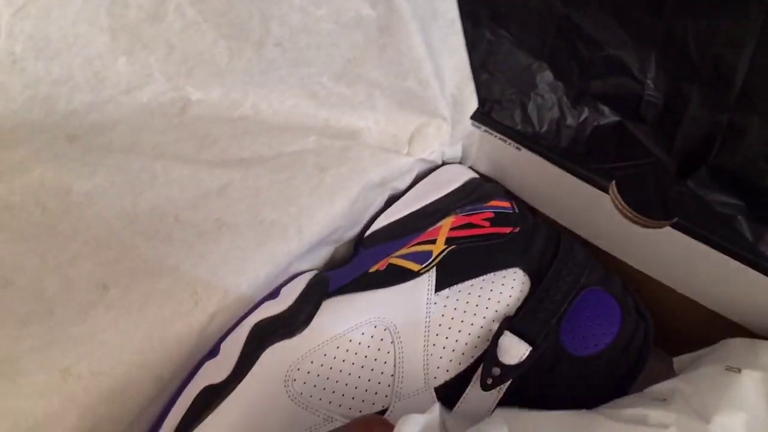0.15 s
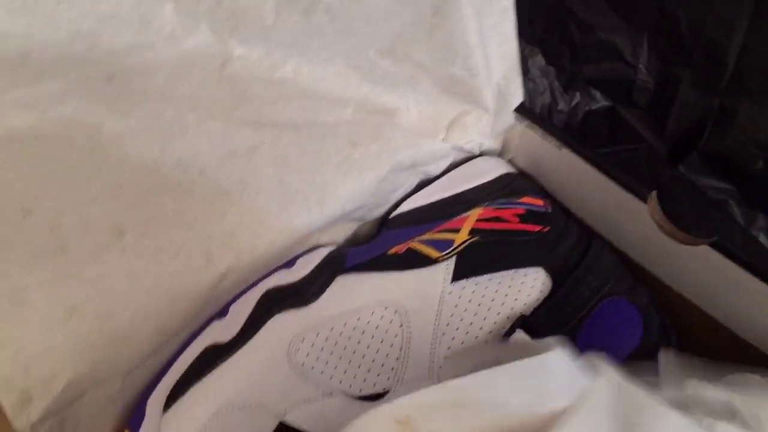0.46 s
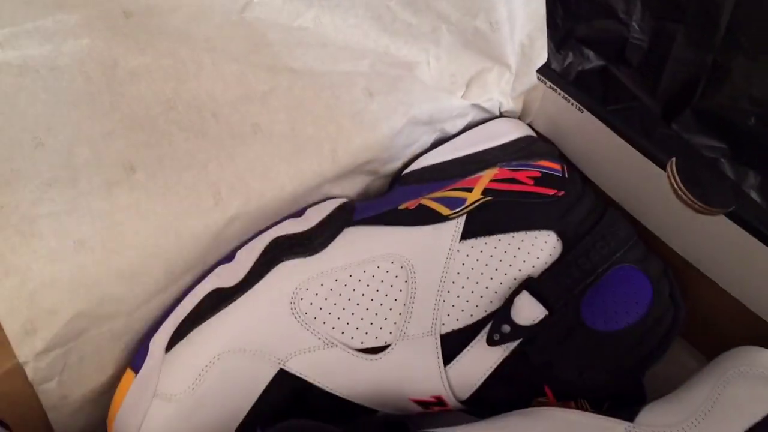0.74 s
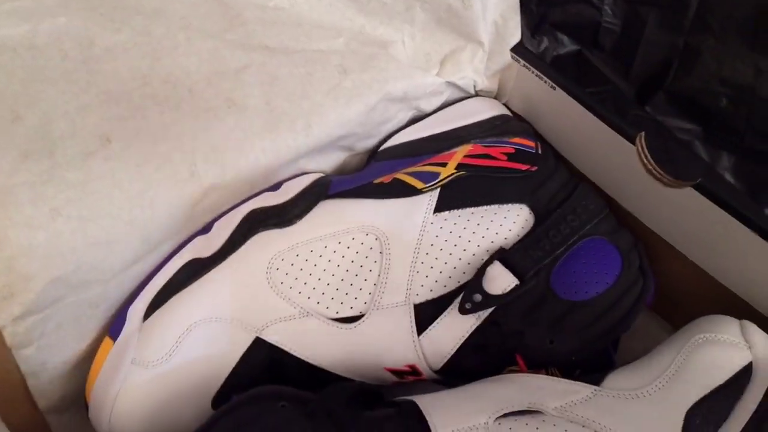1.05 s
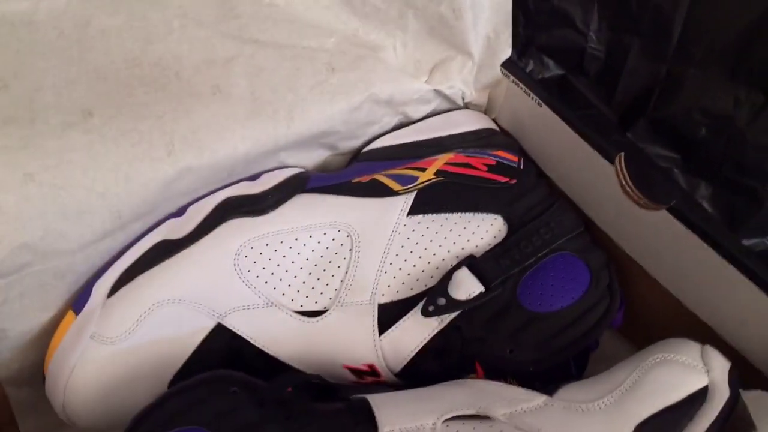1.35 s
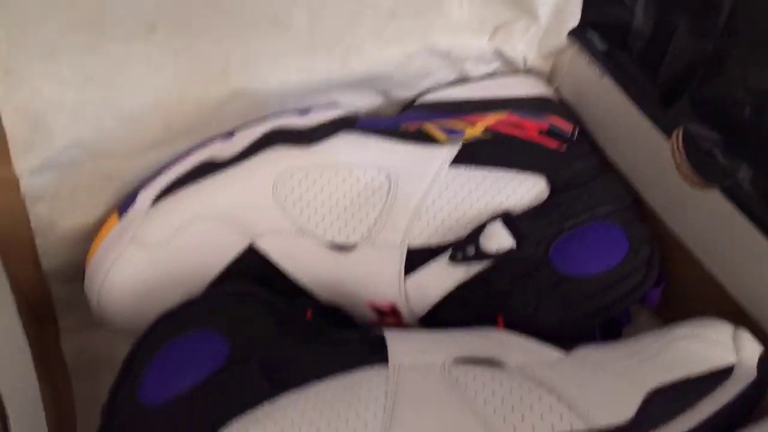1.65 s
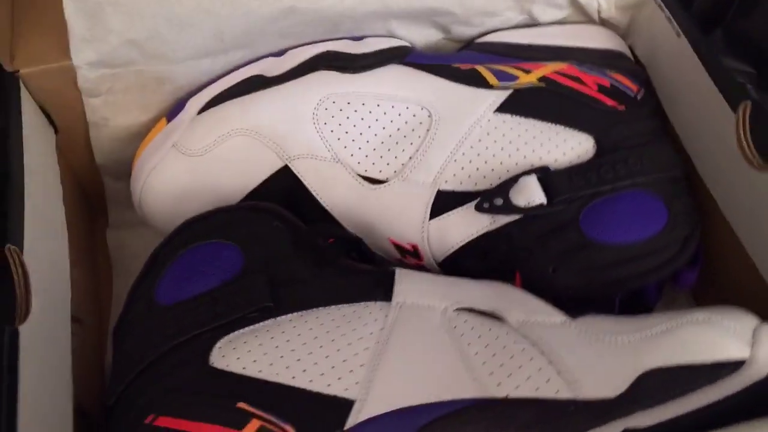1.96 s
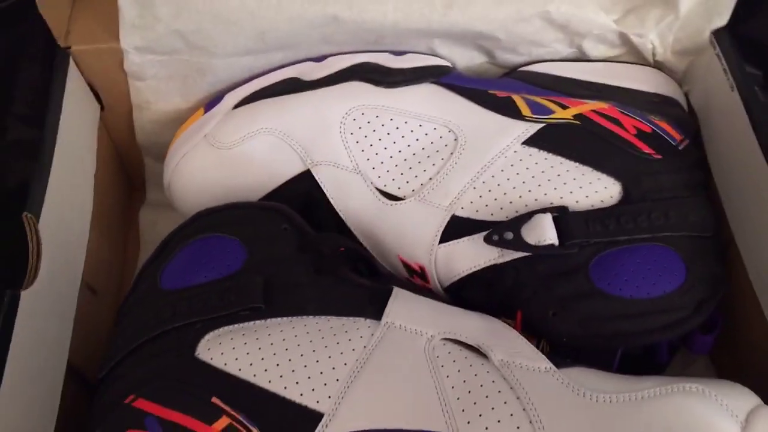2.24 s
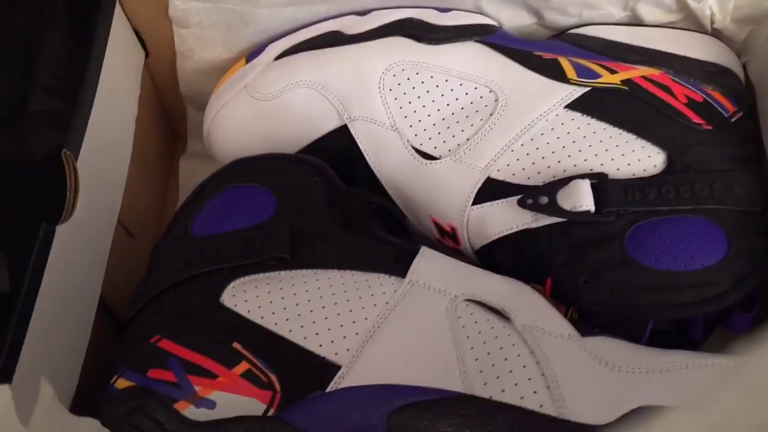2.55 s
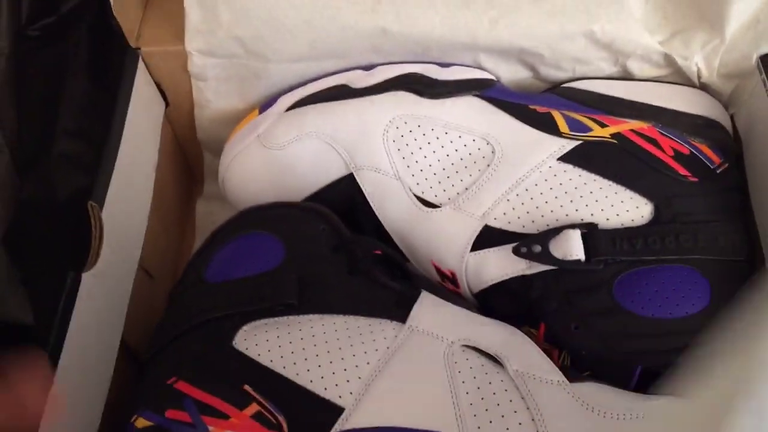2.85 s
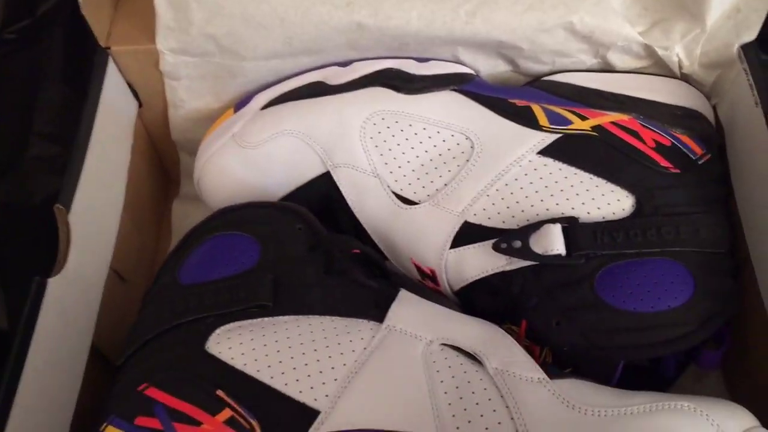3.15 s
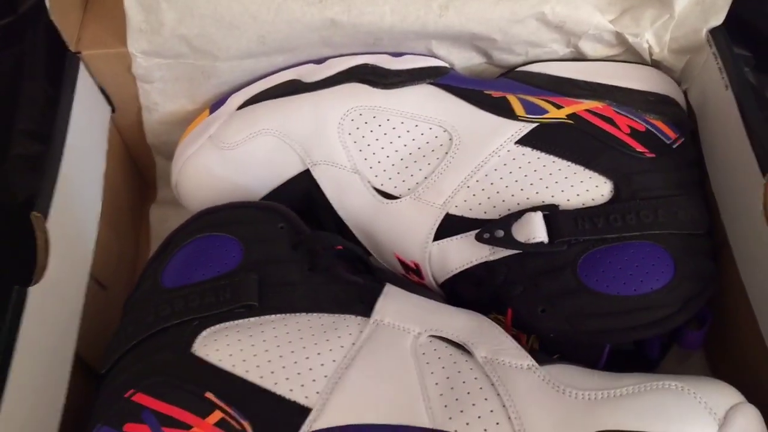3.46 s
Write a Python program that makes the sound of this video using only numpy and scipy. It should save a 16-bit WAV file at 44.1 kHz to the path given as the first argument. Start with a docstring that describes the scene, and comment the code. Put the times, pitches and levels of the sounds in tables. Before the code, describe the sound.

Close, crisp rustling of tissue paper in a shoebox starts loud, thins to small snaps and soft scuffs against cardboard, then builds again. A low rumble lies underneath in the small room.

```python
"""A crackle of tissue paper comes first, close by: a hand crumples one sheet aside in a shoebox,
then slides and folds back another. Creases release their elastic energy in single snaps, over a bed
of tiny buckles and the friction hiss of paper on paper. Small panels pop through with a hollow tick,
and the paper scuffs the cardboard. Box and room answer briefly; a low room rumble lies underneath."""
import sys
import numpy as np
from scipy import signal
from scipy.fft import rfft, irfft, next_fast_len
from scipy.io import wavfile
from scipy.ndimage import uniform_filter1d

SR = 44100
rng = np.random.default_rng(int(sys.argv[2]) if len(sys.argv) > 2 else 0)


def dump(signal):
    """Clip the signal to [-1, 1] and save it as 16-bit WAV at the path in sys.argv[1]."""
    limited = np.clip(np.atleast_2d(signal).T, -1, 1)
    pcm = np.round(limited * 32767).astype(np.int16)
    wavfile.write(sys.argv[1], SR, pcm)


N = 158760

# spectral shape of the room's background: frequency_hz, gain_db
ROOM_SPECTRUM = [(20, -44.5), (50, -8), (80, 4), (92, 3), (120, 4.5), (145, -4.5), (170, -16), (500, -36.5),
                 (2000, -38.5), (15000, -49.5)]
# spectral shape of the wall reflections: frequency_hz, gain_db
WALL_SPECTRUM = [(600, -1.5), (1900, 2.5), (4000, -12.5), (12000, -4)]
# spectral shape of the paper in the box: frequency_hz, gain_db
PAPER_SPECTRUM = [(30, -27.5), (140, -7), (260, -2.5), (370, -5.5), (480, -6.5), (800, -3.5), (1700, 0),
                  (3400, -0.5), (4900, -3.5), (6300, -2), (7700, -7), (9200, -6), (10400, -10.5),
                  (11800, -8), (15000, -11.5)]
# the hand's effort as it crumples the first sheet: time_s, level_db
CRUMPLE_EFFORT = [(0.0, -40.5), (0.09, -47.5), (0.12, -33), (0.18, -24.5), (0.25, -26.5), (0.29, -32.5),
                  (0.36, -28.5), (0.395, -39.5), (0.495, -32), (0.518, -19), (0.548, -27.5), (0.584, -19.5),
                  (0.604, -26.5), (0.66, -36), (0.74, -37.5), (0.81, -32.5), (0.833, -28.5), (0.861, -35),
                  (0.91, -37.5), (0.945, -57.5), (1.005, -46), (1.06, -43), (1.12, -53), (1.23, -43.5),
                  (1.285, -27.5), (1.325, -31.5), (1.361, -31), (1.387, -21.5), (1.411, -31), (1.469, -41),
                  (1.499, -56), (1.55, -81.5)]
# the hand's effort as it slides and folds the second: time_s, level_db, tilt_db_per_octave
FOLD_EFFORT = [(1.76, -49.5, -8), (1.77, -43, -1.8175), (1.85, -31, 2), (1.877, -44, -4), (1.94, -82, 3),
               (2.22, -58.5, 2), (2.289, -45, 4.5), (2.358, -47, 2), (2.408, -36, -0.5), (2.435, -47.5, 2),
               (2.466, -39, -4.5), (2.515, -69.5, -5.5), (2.57, -50.5, 6), (2.613, -64, -2.5),
               (2.63, -32.5, 1.9573), (2.652, -64, -7), (2.762, -72.5, 2), (2.783, -41, -2.5),
               (2.815, -82, -4.5), (2.899, -31, 2.5), (2.925, -50, -0.5), (2.956, -29.5, 2.5),
               (3.021, -45, -4), (3.065, -33, 1.6446), (3.113, -30.5, -1.4811), (3.181, -53, 0),
               (3.257, -62.5, -5.5), (3.276, -31, -1.9829), (3.341, -49, 1), (3.358, -36.5, -2.5),
               (3.459, -18, 2.2055), (3.486, -31.5, -2), (3.554, -51, -2.5), (3.6, -34, 1.19)]
# paper brushing the cardboard: start_s, level_db, length_ms, resonance_hz
CARDBOARD_SCUFFS = [(1.465, -34, 57.59, 1911), (1.641, -49, 22.495, 1950), (1.7, -43.5, 30.32, 1310),
                    (2.245, -38.5, 76.36, 1360), (2.483, -40.5, 30.75, 3000)]
# small panels of paper popping through: start_s, level_db, resonance_hz
PANEL_POPS = [(0.2986, -26, 1800), (0.9892, -22.5, 6426), (1.0253, -31, 1625), (1.1354, -28.5, 2520),
              (1.6626, -46.5, 3270), (1.859, -23.5, 2616), (1.9787, -44, 1792), (2.104, -44.5, 1577),
              (2.687, -45.5, 1684), (3.317, -21, 1676), (3.5694, -29.5, 2443)]
# creases letting go: start_s, relative_level_db, length_ms, tilt_db_per_octave
CREASE_SNAPS = [(0.1261, -19, 11.81, 0.5), (0.1501, -16, 4.777, 6.5), (0.2252, -23, 4.664, 1),
                (0.2741, -18, 4.083, 2.0876), (0.3432, -26.5, 4.3, 3), (0.38, -26, 3.584, 5.5),
                (0.4039, -29, 4.9, 1), (0.4173, -22, 6.956, 1), (0.468, -20.5, 1.75, 4.5),
                (0.5017, -19, 5.93, 1.5), (0.5243, -15, 5.287, 6), (0.5653, -17, 13.21, 1),
                (0.579, -12, 13.305, 5.2), (0.644, -21.5, 7.524, 3.5), (0.7109, -26.5, 5.185, 3),
                (0.756, -23.5, 3.14, 0.5), (0.8165, -18, 2.644, 6), (0.827, -16.5, 5.815, 4),
                (0.8709, -24.5, 6.77, -1.5), (0.8944, -29, 0.881, 0), (0.923, -32.5, 3.764, 0),
                (0.9548, -28.5, 1.248, 8.5), (0.9784, -26.5, 1.278, 1.5), (0.9898, -22.5, 2.853, 1.1054),
                (1.0341, -33, 2.13, 2), (1.0964, -29, 1.866, 2.5), (1.1481, -23.5, 2.057, 0.5),
                (1.167, -31, 1.932, 4.2781), (1.187, -30, 9.84, -2), (1.214, -21, 2.678, 5.5),
                (1.2635, -23.5, 1.825, 4.5), (1.2944, -25.5, 0.584, 8.5), (1.35, -21.5, 5.16, 3.5),
                (1.37, -18, 8.9, 1.5), (1.4278, -29.5, 5.17, -1.5), (1.7664, -29.5, 2.317, 2.5),
                (1.7927, -31.5, 1.447, 5.5), (1.859, -22, 1.452, 5.5), (1.897, -38, 2.806, -3),
                (1.9131, -44.5, 2.305, -2), (2.1809, -34.5, 1.501, 0.1823), (2.3363, -34.5, 3.978, -1.0055),
                (2.384, -35.5, 3.34, -2.5), (2.4018, -22.5, 1.426, -1), (2.4069, -29, 1.731, -1.5),
                (2.442, -37.5, 4, -0.5), (2.458, -25.5, 3.677, 3.5), (2.525, -39, 2.413, 4.5),
                (2.598, -46.5, 2.2, 0.5), (2.837, -37.5, 13.58, -2), (2.942, -29.5, 7.36, 0.9424),
                (2.9781, -25.5, 9.176, -1), (3.0522, -21.5, 3.48, 1.5), (3.0952, -24, 2.336, 3),
                (3.2158, -38.5, 12.635, -1), (3.3171, -25.5, 0.772, -2), (3.3621, -22.5, 1.284, 8.5),
                (3.4127, -20, 0.4403, 4), (3.4355, -23, 0.882, -0.5)]

TILT_PIVOT_HZ, RESONANCE_OCTAVES = 4760, 1.15
ROOM_DB, HANDLING_DB, HANDLING_HZ = -48, -70.5, 1086.4
BOX_DB, BOX_T60_S = -12.5, 0.034735
WALLS_DB, WALLS_T60_S = -23, 0.2784
BUCKLES_PER_S, BUCKLE_ONSET_DB = 450, -57.5  # well below this effort the paper only slides
BUCKLE_CEILING = 4.7  # largest buckle, in standard deviations of level
SCUFF_PEAK_DB, POP_PEAK_DB, POP_T60_S = 14, 26, 0.01733
CRINKLE_DB, CRINKLE_SPAN_S = -16, 0.033
FLAP_PEAK_DB, FLAP_HZ, FLAP_CUT_HZ = 3, 3001, 200  # a small flap radiates little below the cut
SNAP_TRIM_DB, SNAP_FALL_DB, SNAP_RISE_S = 2, 7.5, 0.00052  # the fall is per snap length
SATURATION, TOP_HZ = 0.6, 15300


def amp(db):
    return 10 ** (np.asarray(db) / 20)


def unit_rms(x):
    return x / np.sqrt(np.mean(x ** 2) + 1e-20)


def along(spectrum, hz):
    """Gain in dB, interpolated on a logarithmic frequency axis."""
    points_hz, gain_db = np.transpose(spectrum)
    return np.interp(np.log(hz + 1), np.log(points_hz + 1), gain_db)


def octaves(hz):
    """Interval from the pivot of a spectral tilt; the bass counts as one band."""
    return np.log2(np.maximum(hz, 900) / TILT_PIVOT_HZ)


def resonance(hz, centre_hz, width_octaves=RESONANCE_OCTAVES):
    """A resonance curve of height 1, symmetric in log frequency."""
    return 1 / (1 + (np.log2((hz + 1) / centre_hz) / width_octaves) ** 2)


def coloured(x, gain_db, size=2 ** 18):
    """Minimum-phase filtering: folding the cepstrum gives a causal filter with gain_db(hz)."""
    cepstrum = irfft(np.log(amp(gain_db(np.fft.rfftfreq(size, 1 / SR)))))
    cepstrum[1:size // 2] *= 2
    cepstrum[size // 2 + 1:] = 0
    return irfft(rfft(x, size) * np.exp(rfft(cepstrum)), size)[:len(x)]


def noise(gain_db):
    """Gaussian noise of rms 1 with the spectral shape gain_db(hz)."""
    return unit_rms(coloured(rng.standard_normal(N), gain_db))


def flexing(x, tilt_at, patchy_db):
    """Bending alters a sheet's response: the spectrum tilts and resonances come and go."""
    hz, t, spectra = signal.stft(x, SR, nperseg=512)
    patches = uniform_filter1d(rng.standard_normal(spectra.shape), size=5, axis=0)
    patches = unit_rms(uniform_filter1d(patches, size=7, axis=1))
    gain = amp(patchy_db * patches + octaves(hz)[:, None] * tilt_at(t))
    return signal.istft(spectra * gain, SR, nperseg=512)[1][:N]


def add(out, start_s, db, tick):
    """Superpose a transient carrying the energy of 5 ms at level db."""
    tick = tick * amp(db) * np.sqrt(SR / 200) / np.linalg.norm(tick)
    part = out[round(start_s * SR):][:len(tick)]
    part += tick[:len(part)]


def room_rumble():
    """Ambient noise: stationary, with its energy concentrated in the bass."""
    return amp(ROOM_DB) * noise(lambda hz: along(ROOM_SPECTRUM, hz))


def box_handling():
    """Frictional excitation: shifting fingers faintly stir the cardboard's resonances."""
    rub = noise(lambda hz: 30 * resonance(hz, HANDLING_HZ, width_octaves=2.2))
    return amp(HANDLING_DB) * unit_rms(flexing(rub, lambda t: -2, patchy_db=5.5))


def reflected(x, t60_s, delay_s, count=12):
    """Echo paths change as the paper moves: convolution with a succession of decaying responses."""
    t = np.arange(int(t60_s * SR) + 8) / SR
    position = np.linspace(0, count - 1, N)
    out = np.zeros(N)
    for k in range(count):
        tail = rng.standard_normal(len(t)) * np.exp(-np.log(1000) * t / t60_s)
        response = np.pad(tail / np.linalg.norm(tail), (round(delay_s * SR), 0))
        crossfade = np.maximum(1 - abs(position - k), 0)
        out += signal.oaconvolve(x * crossfade, response)[:N]
    return out


def echoes(x):
    """Reverberation: quick reflections inside the box, then a faint tail from the walls."""
    box = coloured(reflected(x, BOX_T60_S, delay_s=0.0013948), lambda hz: -1.2 * octaves(hz))
    walls = coloured(reflected(x, WALLS_T60_S, delay_s=0.0092), lambda hz: along(WALL_SPECTRUM, hz))
    return amp(BOX_DB) * box + amp(WALLS_DB) * walls


def waft(db, centre_hz):
    """Air displacement: the whole moving sheet radiates a low flutter."""
    return amp(db) * noise(lambda hz: -15 * np.log10(1 + np.log2((hz + 1) / centre_hz) ** 4))


def buckles(spread_db, decay_s):
    """Buckling as a Poisson process: tiny crackles of log-normal size, together of rms 1."""
    sizes = amp(spread_db * np.minimum(rng.standard_normal(N), BUCKLE_CEILING))
    onsets = rng.random(N) < BUCKLES_PER_S / SR
    power = signal.lfilter([1], [1, -np.exp(-2 / (decay_s * SR))], (sizes * onsets) ** 2)
    crackle = np.sqrt(power) * rng.standard_normal(N)
    return unit_rms(coloured(crackle, lambda hz: along(PAPER_SPECTRUM, hz) + 0.5 * octaves(hz)))


def rustle(effort, crackle_db, hiss_db, hiss_tilt, spread_db, decay_s):
    """Sliding friction hisses; buckling joins in once the hand presses hard enough."""
    hiss = noise(lambda hz: along(PAPER_SPECTRUM, hz) + hiss_tilt * octaves(hz))
    buckling = effort / (effort + amp(BUCKLE_ONSET_DB))
    return effort * (amp(crackle_db) * buckling * buckles(spread_db, decay_s) + amp(hiss_db) * hiss)


def stroke(time_s, level_db):
    """Amplitude envelope of one hand movement, silent outside its span."""
    return amp(np.interp(np.arange(N) / SR, time_s, level_db, left=-120, right=-120))


def crumpling():
    """Buckling dominates the first sheet's rustle, which dulls as the hand eases off."""
    time_s, level_db = np.transpose(CRUMPLE_EFFORT)
    effort = stroke(time_s, level_db)
    tilt_at = lambda t: np.minimum(0.3456 * (np.interp(t, time_s, level_db) + 39.0), 0)
    sheet = rustle(effort, crackle_db=-1.5, hiss_db=-4, hiss_tilt=-1.5023,
                   spread_db=5.0, decay_s=0.0004665)
    return flexing(sheet + effort * waft(db=-28.5, centre_hz=326.09), tilt_at, patchy_db=3.0)


def folding():
    """Friction has a larger share in the second sheet, which slides more and crackles less."""
    time_s, level_db, tilt = np.transpose(FOLD_EFFORT)
    effort = stroke(time_s, level_db)
    tilt_at = lambda t: np.interp(t, time_s, tilt)
    sheet = rustle(effort, crackle_db=-2, hiss_db=-2.5, hiss_tilt=-0.5, spread_db=6.5, decay_s=0.0005)
    return flexing(sheet + effort * waft(db=-18.5, centre_hz=106.6), tilt_at, patchy_db=2.4242)


def scuffs():
    """Friction against the cardboard: a soft swell of noise through one broad resonance."""
    out = np.zeros(N)
    for start_s, db, length_ms, ring_hz in CARDBOARD_SCUFFS:
        swell = np.hanning(round(length_ms * SR / 1000))
        colour = lambda hz: (along(PAPER_SPECTRUM, hz) + SCUFF_PEAK_DB * resonance(hz, ring_hz)
                             - 2 * octaves(hz))
        add(out, start_s, db, coloured(swell * rng.standard_normal(len(swell)), colour, size=8192))
    return out


def pops():
    """Snap-through instability: a panel flips over and rings briefly in one broad resonance."""
    out, t = np.zeros(N), np.arange(2048) / SR
    for start_s, db, ring_hz in PANEL_POPS:
        burst = rng.standard_normal(len(t)) * np.exp(-np.log(1000) * t / POP_T60_S)
        colour = lambda hz: along(PAPER_SPECTRUM, hz) + POP_PEAK_DB * resonance(hz, ring_hz)
        add(out, start_s, db, coloured(burst, colour, size=4096))
    return out


def crinkles(t, count=4):
    """A small avalanche: the envelope of tiny creases that give way just after a snap."""
    since_s = t - CRINKLE_SPAN_S * rng.random((count, 1))
    return amp(CRINKLE_DB) * np.exp(-abs(since_s) / SNAP_RISE_S).sum(axis=0)


def snaps():
    """Elastic release: each crease lets go, rings the flap beside it and sets off its neighbours."""
    out, t = np.zeros(N), np.arange(2048) / SR
    radiation_db = lambda hz: -10 * np.log10(1 + (FLAP_CUT_HZ / (hz + 1)) ** 2)
    for start_s, db, length_ms, tilt in CREASE_SNAPS:
        release = amp(-SNAP_FALL_DB * t * 1000 / length_ms) * (1 - np.exp(-t / SNAP_RISE_S))
        burst = rng.standard_normal(len(t)) * (release / release.max() + crinkles(t))
        flap_hz = FLAP_HZ * 2 ** rng.standard_normal()
        flap_db = lambda hz: FLAP_PEAK_DB * resonance(hz, flap_hz, width_octaves=1.0)
        colour = lambda hz: along(PAPER_SPECTRUM, hz) + tilt * octaves(hz) + flap_db(hz) + radiation_db(hz)
        add(out, start_s, db + SNAP_TRIM_DB, coloured(burst, colour, size=4096))
    return out


def scene():
    """Superposition of the paper, its echoes, the held box and the room's rumble, in one channel."""
    paper = snaps() + pops() + scuffs() + crumpling() + folding()
    rumble = room_rumble()
    return (paper + echoes(paper) + box_handling() + rumble)[None]


def record(dry):
    """Soft saturation rounds the tallest peaks; a steep low-pass filter limits the bandwidth."""
    size = next_fast_len(N + SR)
    rounded = dry / (1 + (dry / SATURATION) ** 4) ** (1 / 4)
    low_pass = 1 / np.sqrt(1 + (np.fft.rfftfreq(size, 1 / SR) / TOP_HZ) ** 200)
    return irfft(rfft(rounded, size) * low_pass, size)[:, :N]


dry = scene()
out = record(dry)
dump(out)
```